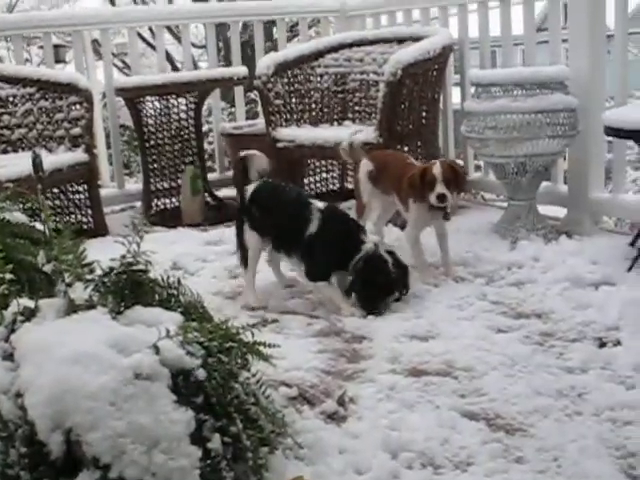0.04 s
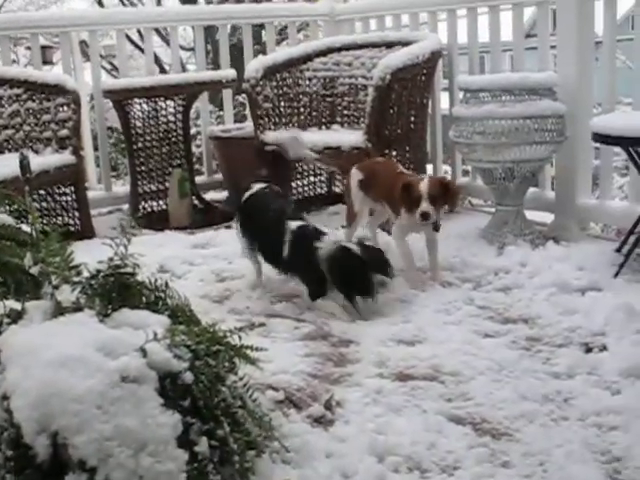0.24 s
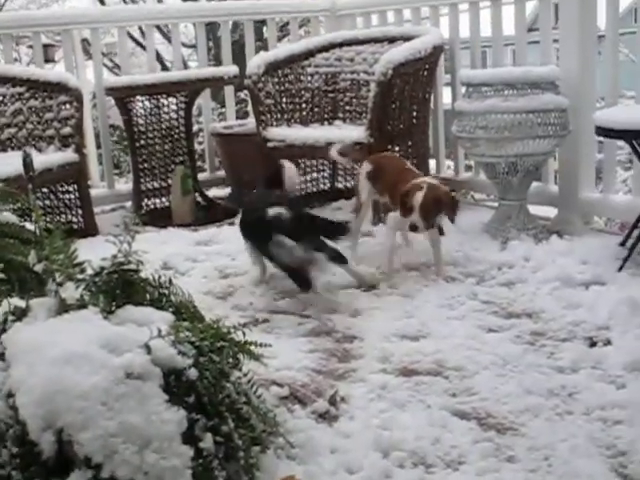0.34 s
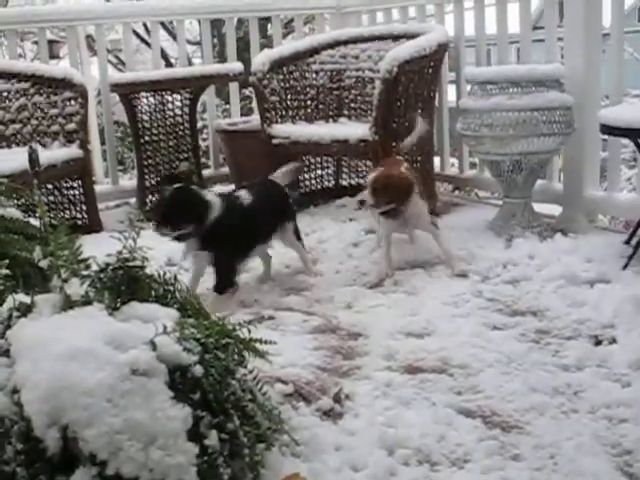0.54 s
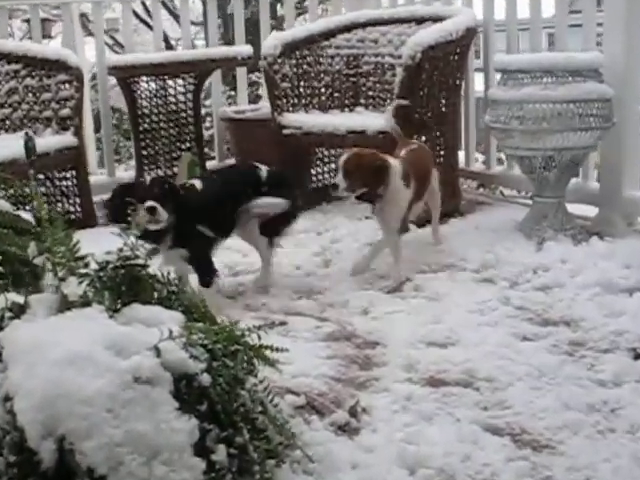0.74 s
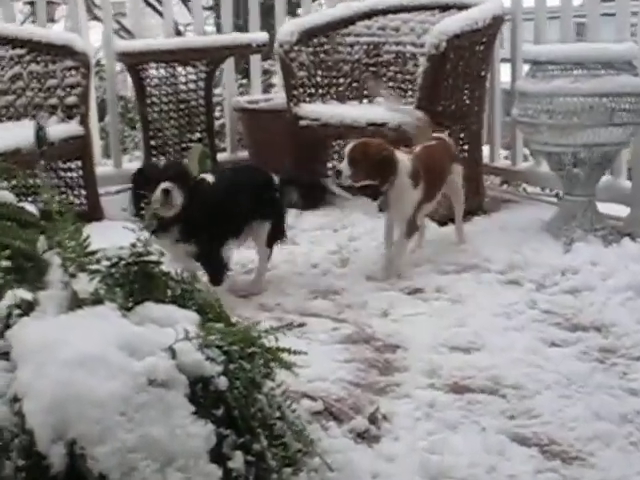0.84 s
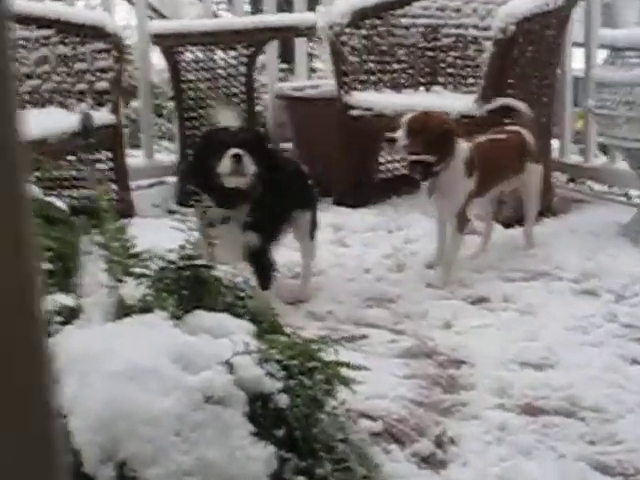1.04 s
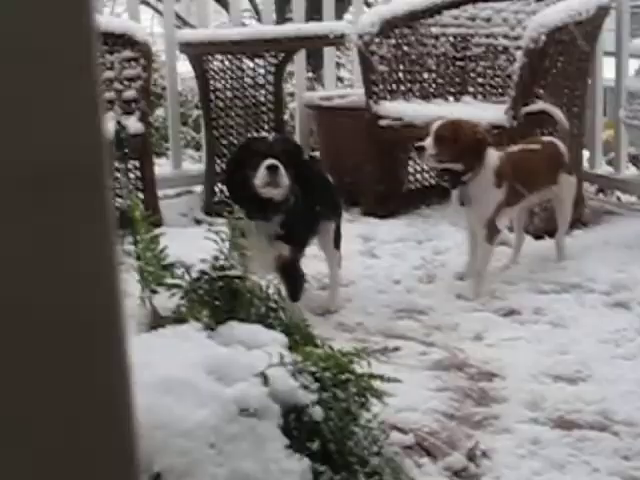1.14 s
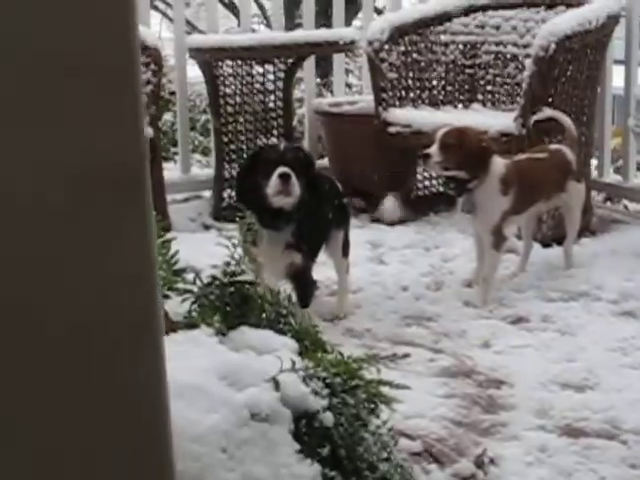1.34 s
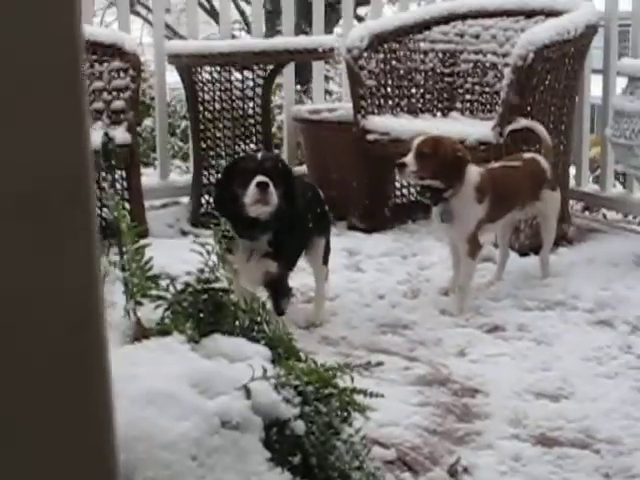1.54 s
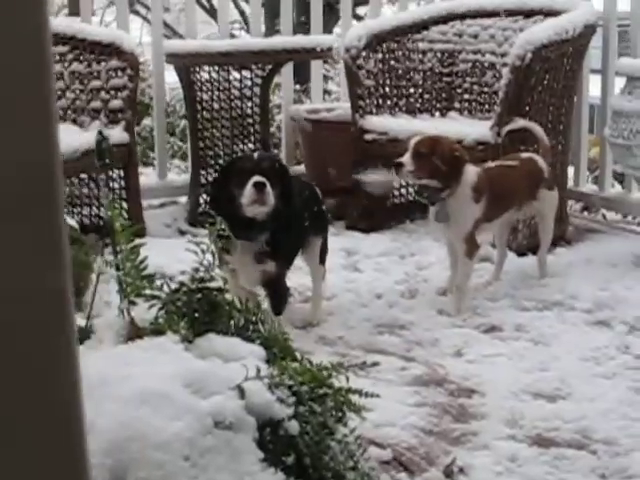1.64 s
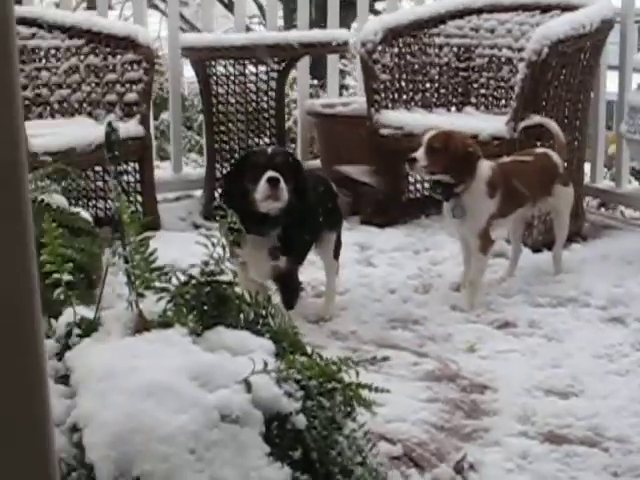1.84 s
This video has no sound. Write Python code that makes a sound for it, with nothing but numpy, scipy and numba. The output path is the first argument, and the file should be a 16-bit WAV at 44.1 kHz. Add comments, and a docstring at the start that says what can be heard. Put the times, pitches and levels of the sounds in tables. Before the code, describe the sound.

One sharp, bright knock sounds close to a hand-held microphone outdoors. Soft sleeve rustling and small finger ticks come just before it, while light wind rumbles and thumps on the microphone over a steady hiss.

```python
"""Sleeve rustle and a sharp knock, outdoors

Light wind buffets the two microphone ports of a hand-held camera over a steady outdoor hiss.
A sleeve rubs and fingers tick on the casing, then something hard snaps against it and rings
its damped modes in one sharp knock. The gain control ducks at the knock and creeps back."""
import sys
import numpy as np
from scipy import signal
from scipy.fft import rfft, irfft
from scipy.io import wavfile
from numba import njit

SR = 44100
rng = np.random.default_rng(int(sys.argv[2]) if len(sys.argv) > 2 else 0)


def generate_wav(signal):
    """Clip the signal to [-1, 1] and save it as 16-bit WAV at the path in sys.argv[1]."""
    frames = np.transpose(np.atleast_2d(signal))
    scaled = np.clip(frames, -1, 1) * 32767
    pcm = np.round(scaled).astype(np.int16)
    wavfile.write(sys.argv[1], SR, pcm)


N = 83790
TIME_S = np.arange(N) / SR
FREQ_HZ = np.fft.rfftfreq(N, 1 / SR)


def undb(db):
    """Decibels to gain."""
    return 10 ** (np.asarray(db) / 20)


def unit_rms(x):
    """Scale to rms 1."""
    return x / np.sqrt(np.mean(x ** 2))


def pan(left_minus_right_db):
    """Left and right gains; the nearer port gets 1."""
    return undb(np.minimum([[left_minus_right_db], [-left_minus_right_db]], 0))


def over_time(table, column=1):
    """Table column, interpolated in time."""
    rows = np.array(table)
    return np.interp(TIME_S, rows[:, 0], rows[:, column])


def over_freq(table, column=1):
    """Table column, interpolated in log frequency."""
    rows = np.array(table)
    return np.interp(np.log(FREQ_HZ + 1), np.log(rows[:, 0]), rows[:, column])


def decay(start_s, t60_s):
    """Silence, then exponential decay from 1."""
    age_s = (np.arange(N) - round(start_s * SR)) / SR
    return (age_s >= 0) * np.exp(-np.log(1000) * np.maximum(age_s, 0) / t60_s)


def butter(x, hz, kind):
    """Two-pole low-pass or high-pass."""
    return signal.sosfilt(signal.butter(2, hz, kind, fs=SR, output="sos"), x)


def resonance(noise, hz, width_hz):
    """Noise through two band-passes in series, rms 1."""
    for band_hz in (width_hz, 2 * width_hz):
        noise = signal.lfilter(*signal.iirpeak(hz, hz / band_hz, fs=SR), noise)
    return unit_rms(noise)


def flicker(rate_hz):
    """Smooth random wander, rms 1."""
    spectrum = rfft(rng.standard_normal(N)) * np.exp(-(FREQ_HZ / rate_hz) ** 2)
    return unit_rms(irfft(spectrum, N))


def stereo_noise(spectrum, stereo):
    """Coloured noise with coherence and balance set per frequency, rms 1."""
    mid, side = rfft(rng.standard_normal((2, N)))
    coherence = np.clip(over_freq(stereo), 0, 1)
    sign = np.array([[1], [-1]])
    ports = mid * np.sqrt(1 + coherence) + sign * side * np.sqrt(1 - coherence)
    shape_db = over_freq(spectrum) + sign * over_freq(stereo, column=2) / 2
    return unit_rms(irfft(ports * undb(shape_db), N))


# Hiss spectrum (frequency [Hz], relative density [dB])
HISS_SPECTRUM = [(100, 12.5), (250, 2.5), (400, 0.5), (700, 0), (1100, 0), (1700, 1), (2500, 0),
                 (3500, -2.5), (5200, -4), (7000, -10), (9000, -19), (12000, -25.5), (16000, -35)]
# Hiss at the two ports (frequency [Hz], coherence [0-1], left minus right [dB])
HISS_IMAGE = [(199, 1, -0.5), (694, 0.97, -3), (1410, 0.84, -2.5), (2830, 0.53, -2.5), (4830, 0.04, 2),
              (5860, 0, -1), (7200, 0.14, -10.5), (15000, 0.24, 3.5)]


def outdoor_hiss():
    """Steady outdoor background with a slight level flicker."""
    level_db, flicker_db = -42, 1
    return stereo_noise(HISS_SPECTRUM, HISS_IMAGE) * undb(level_db + flicker_db * flicker(rate_hz=36))


# Turbulence spectrum (frequency [Hz], relative density [dB])
WIND_SPECTRUM = [(15, 1.5), (28, 0.5), (55, 6.5), (90, 3.5), (130, -3.5), (200, -13), (300, -22.5),
                 (450, -33), (900, -43), (4000, -100)]
# Gust envelope (time [s], left level [dB], right level [dB])
GUST_LEVELS = [(0, -35, -35), (.16, -49, -43), (.31, -42, -29.5), (.42, -50, -40), (.52, -35, -31),
               (.6, -32.5, -37), (.68, -29, -31), (.77, -29.5, -26.5), (.85, -26.5, -24.5), (.92, -22, -25),
               (.98, -29.5, -25.5), (1.04, -35.5, -34), (1.14, -32, -31.5), (1.24, -25, -32),
               (1.34, -24.5, -26), (1.44, -34, -37.5), (1.6, -46, -32), (1.72, -45.5, -42), (1.9, -40, -31)]
# Single eddies (time [s], peak [dB], pitch [Hz], left minus right [dB])
EDDY_THUMPS = [(0.321, -14.5, 99, -31), (0.484, -19, 127, -28), (.513, -24.5, 90, 8),
               (0.539, -21, 89.5, -23), (.590, -23.5, 85, 28), (0.715, -20, 120, 8),
               (.826, -15.5, 110, -15), (.840, -18, 140, 7.5), (.872, -21.5, 139, -4),
               (0.8837, -13.5, 160, -10), (0.915, -15, 103, 21), (1.216, -19.5, 96, 23),
               (1.258, -19.5, 88, -9), (1.293, -20, 110, 18), (1.369, -16, 54.5, -28),
               (1.508, -17.5, 53, -18), (1.61, -20.5, 68.6, -17)]


def wind():
    """Turbulence rumbles at each port independently; eddies pass as pointed pressure bumps."""
    spectrum = rfft(rng.standard_normal((2, N))) * undb(over_freq(WIND_SPECTRUM))
    gusts = undb([over_time(GUST_LEVELS), over_time(GUST_LEVELS, column=2)])
    out = unit_rms(irfft(spectrum, N)) * gusts
    for centre_s, peak_db, hz, pan_db in EDDY_THUMPS:
        offset_sq = (np.pi * hz * (TIME_S - centre_s)) ** 2
        bump = (1 - 3 * offset_sq) / (1 + offset_sq) ** 3
        out += undb(peak_db) * pan(pan_db) * bump
    return out


# Cloth friction spectrum (frequency [Hz], relative density [dB])
CLOTH_SPECTRUM = [(300, -4), (800, 0.5), (1200, -17), (2000, 1), (3800, 0.5), (5200, 5.5), (6800, 3.5),
                  (8500, -10.5), (12000, -20.5), (16000, -34)]
# Cloth at the two ports (frequency [Hz], coherence [0-1], left minus right [dB])
CLOTH_IMAGE = [(700, 0.98, -2), (2520, 0.68, -4), (4950, 0.4, 2), (6340, 0, -7.5), (7600, .1, -17),
               (10500, 0.4, -13), (15000, .1, -13)]
# Rubbing strokes (time [s], level [dB])
RUB_LEVELS = [(.14, -67), (.185, -40), (.235, -33), (.262, -35), (.295, -43.5), (.318, -36), (.35, -47),
              (.39, -45.5), (.44, -42), (.48, -48), (.53, -49), (.58, -36.5), (.615, -41.5), (.655, -47),
              (.68, -47.5), (1.0, -61), (1.84, -68), (1.88, -54.5), (1.9, -56)]


def sleeve_rustle():
    """Fibres catch and slip in strokes; the first stroke rasps upward as it speeds up."""
    grain_db = 0.5
    rasp_db, rasp_centre_s, rasp_half_width_s = -47.5, 0.212, 0.04
    rasp_hz, rasp_width_hz, rise_hz_per_s = 1170, 185, 4000
    fibres = stereo_noise(CLOTH_SPECTRUM, CLOTH_IMAGE)
    strokes = undb(over_time(RUB_LEVELS) + grain_db * flicker(rate_hz=500))
    offset_s = TIME_S - rasp_centre_s
    phase = 2 * np.pi * np.cumsum(rasp_hz + rise_hz_per_s * offset_s) / SR
    rasp = flicker(rasp_width_hz) * np.sin(phase) + flicker(rasp_width_hz) * np.cos(phase)
    swell = np.exp(-(offset_s / rasp_half_width_s) ** 2)
    return fibres * strokes + undb(rasp_db) * swell * rasp


# Catches on the casing; the last two rows are a faint door creak (time [s], relative level [dB], frequency
# [Hz], width [Hz], t60 [s], left minus right [dB])
TICKS_AND_CREAK = [(0.3109, -26, 4900, 2500, 0.015, -6), (0.346, -31, 3500, 3000, 0.011, 1),
                   (.3530, -26, 5100, 3000, 0.0054, -12), (.4060, -30, 6870, 600, 0.053, -15),
                   (0.425, -44, 7100, 600, .14, -19), (0.4394, -27, 3880, 2500, .008, -5),
                   (.6025, -22, 6340, 2000, 0.011, -9), (0.6249, -19.5, 6370, 2000, 0.0055, -3),
                   (0.64, -22.5, 6800, 1200, 0.011, -13), (.7120, -30, 5240, 1700, 0.036, -3),
                   (0.8836, -38, 4230, 900, 0.085, -2.5), (.8840, -33.5, 7360, 1600, .06, -8),
                   (1.0965, -37, 6000, 3500, .025, -8), (1.516, -40, 6500, 2000, .06, -9),
                   (1.577, -41.5, 5540, 3000, 0.055, -6), (1.872, -40, 4200, 500, 0.23, -17),
                   (1.873, -43, 2530, 397, 0.17, -2)]


def ticks_and_creak():
    """Fingers and fabric catch on the casing, and a door creaks faintly near the end; each burst rings one
    resonance."""
    out = np.zeros((2, N))
    for start_s, level_db, hz, width_hz, t60_s, pan_db in TICKS_AND_CREAK:
        ring = resonance(rng.standard_normal((2, N)), hz, width_hz)
        out += ring * decay(start_s, t60_s) * undb(level_db) * pan(pan_db)
    return butter(out, hz=9300, kind="lowpass")


# Blow and rebound (time [s], relative level [dB])
KNOCK_BLOWS = [(.6644, 0.5), (.6680, -26)]
# Casing modes (frequency [Hz], relative level [dB], t60 [s], left minus right [dB])
CASING_MODES = [(1530, -21, 0.028, -1), (2577, -11.5, 0.026, -12), (2786, -9, 0.018, -20),
                (3570, -0.5, 0.0078, -14), (3880, 2.5, 0.0094, -9.5), (4670, -26, 0.022, -17),
                (5090, -2, 0.013, -9), (6236, -7, 0.016, -30), (8370, -9.5, 0.0048, -18),
                (10820, -12.5, 0.0037, -24), (14580, -13, 0.005, -22)]


def knock():
    """A short scrape swells into a hard blow that rings damped modes and rebounds once."""
    blow_gain_db, contact_s = 6, 0.0015
    crack_relative_db, crack_t60_s, crack_pan_db = -7, 0.011, -25
    scrape_gain_db, scrape_t60_s, scrape_pan_db = -9, 0.014, -25
    out = np.zeros((2, N))
    for start_s, blow_db in KNOCK_BLOWS:
        ring = np.zeros((2, N))
        for hz, mode_db, t60_s, pan_db in CASING_MODES:
            mode = np.sin(2 * np.pi * hz * (TIME_S - start_s)) * decay(start_s, t60_s)
            ring += undb(mode_db) * pan(pan_db) * mode
        noise = butter(rng.standard_normal(N), hz=7560, kind="lowpass")
        crack = undb(crack_relative_db) * pan(crack_pan_db) * decay(start_s, crack_t60_s) * noise
        onset = 1 - decay(start_s, contact_s)
        out += undb(blow_gain_db + blow_db) * (ring + crack) * onset
    until_blow_s = KNOCK_BLOWS[0][0] - TIME_S
    swell = (until_blow_s > 0) * np.exp(-np.log(1000) * np.abs(until_blow_s) / scrape_t60_s)
    scrape = resonance(rng.standard_normal(N), hz=4500, width_hz=1760)
    out += undb(scrape_gain_db) * pan(scrape_pan_db) * swell * scrape
    left, right = butter(out, hz=1470, kind="highpass")  # a small body radiates little bass
    return np.array([np.roll(left, 1), right])  # reaches the left port one sample later


def scene():
    """Sum at the two microphone ports."""
    return outdoor_hiss() + sleeve_rustle() + ticks_and_creak() + knock() + wind()


@njit
def gain_reduction_db(excess_db, attack_s, recover_s):
    """Peak hold on the excess over the limit, with smoothed attack and slow recovery."""
    attack, recover = 1 - np.exp(-1 / (attack_s * SR)), 1 / (recover_s * SR)
    reduction_db = np.empty(len(excess_db))
    held_db, smooth_db = 0., 0.
    for i in range(len(excess_db)):
        held_db = max(excess_db[i], held_db * (1 - recover))
        smooth_db += (held_db - smooth_db) * attack
        reduction_db[i] = smooth_db
    return reduction_db


def record(dry):
    """Gain control ducks at the knock, overshoot clips, circuit hiss adds, the top is cut."""
    limit_db, look_ahead_s = 2.5, 0.00035
    clip_db, circuit_db, top_hz = -0.6, -72.5, 16200
    excess_db = 20 * np.log10(np.abs(dry).max(axis=0) + 1e-9) - limit_db
    duck_db = gain_reduction_db(excess_db, attack_s=0.00067, recover_s=1.0)
    duck_db = np.interp(TIME_S + look_ahead_s, TIME_S, duck_db)
    clipped = np.clip(dry * undb(-duck_db), -undb(clip_db), undb(clip_db))
    circuit_hiss = undb(circuit_db) * rng.standard_normal((2, N))
    lowpass = signal.firwin(201, top_hz, fs=SR)
    return signal.fftconvolve(clipped + circuit_hiss, lowpass[None], mode="same", axes=1)


dry = scene()
out = record(dry)
generate_wav(out)
```